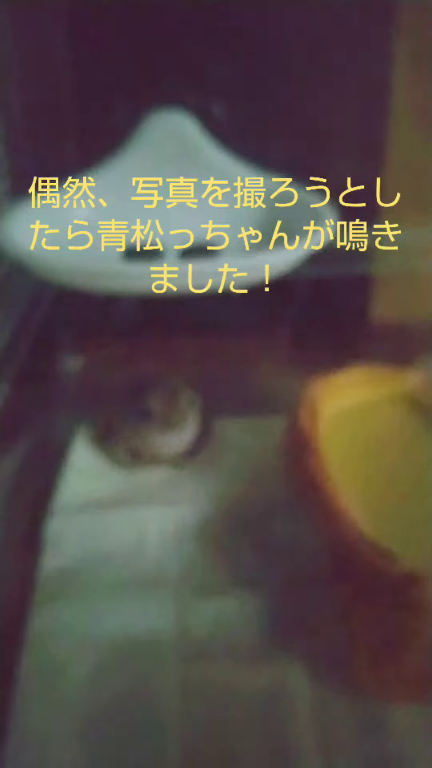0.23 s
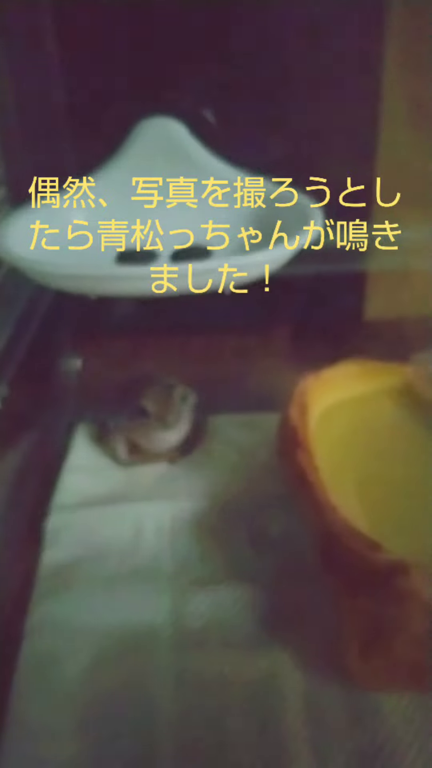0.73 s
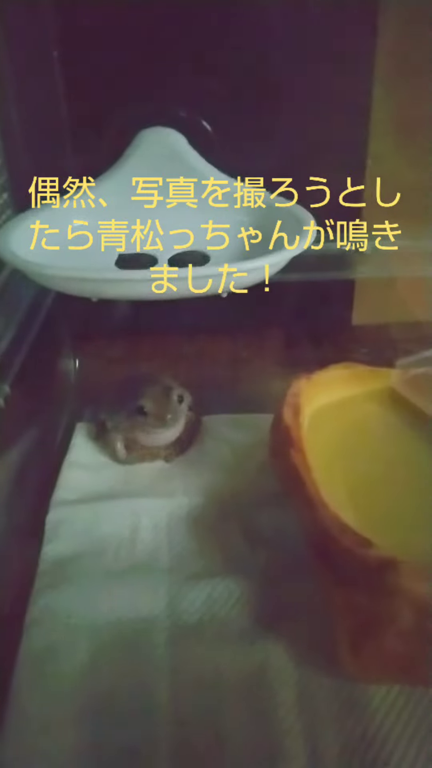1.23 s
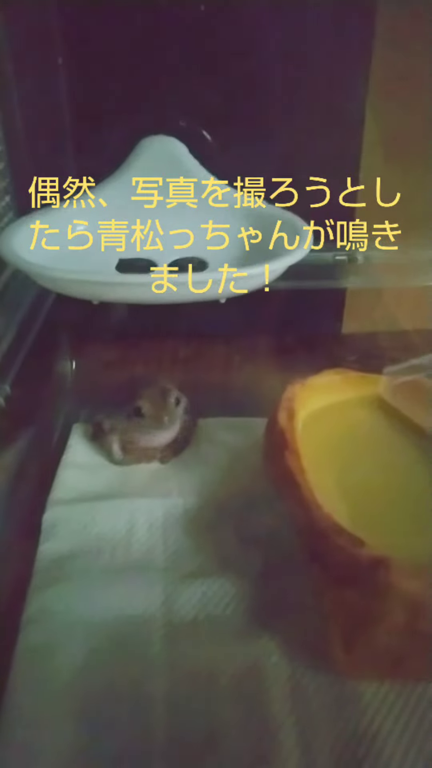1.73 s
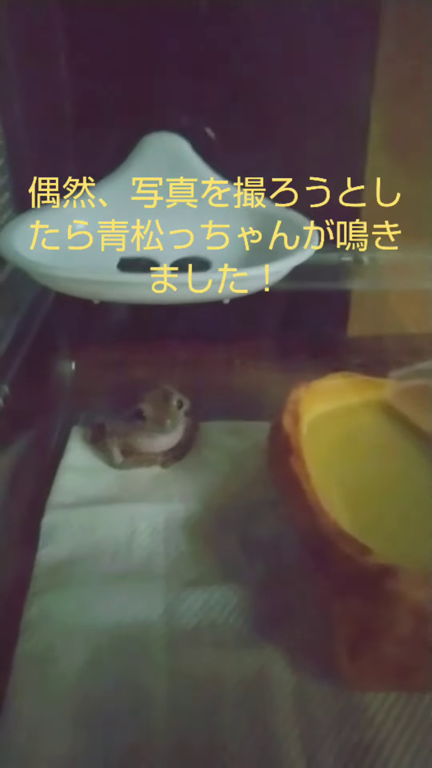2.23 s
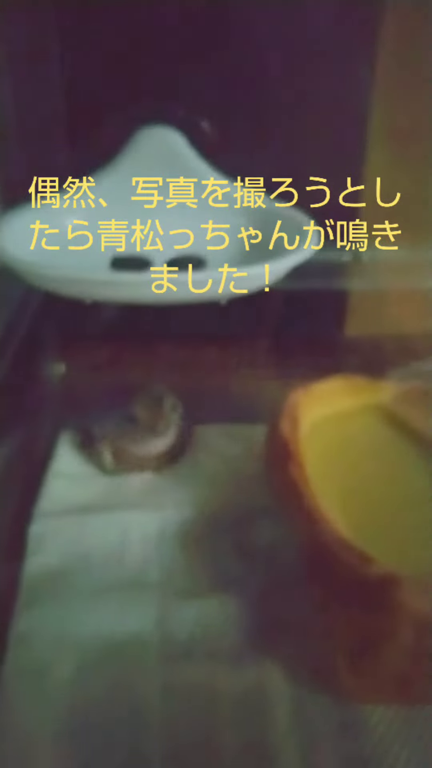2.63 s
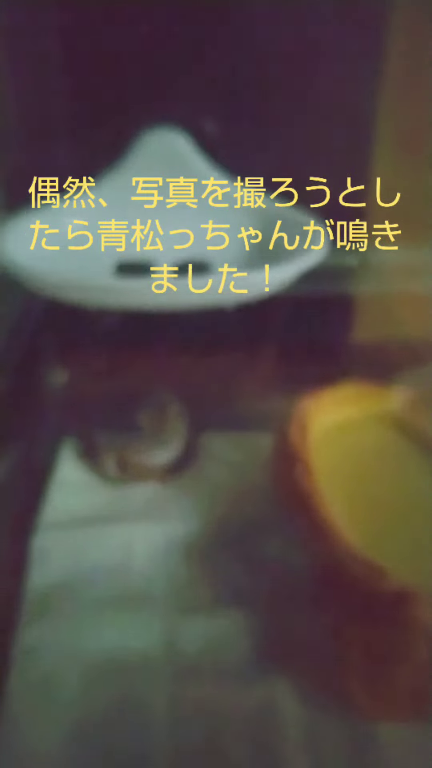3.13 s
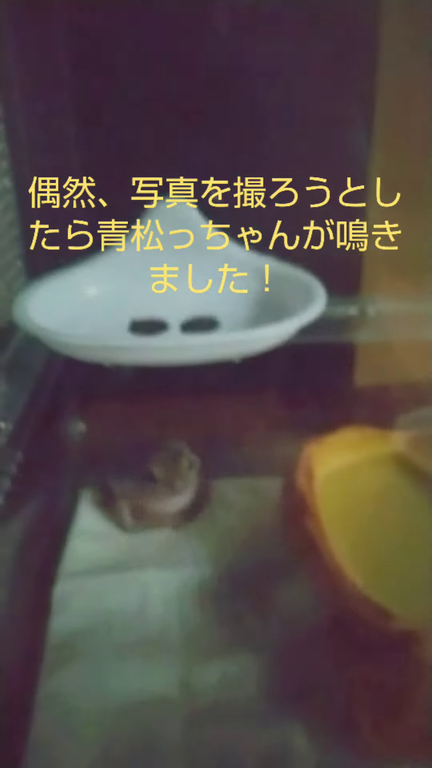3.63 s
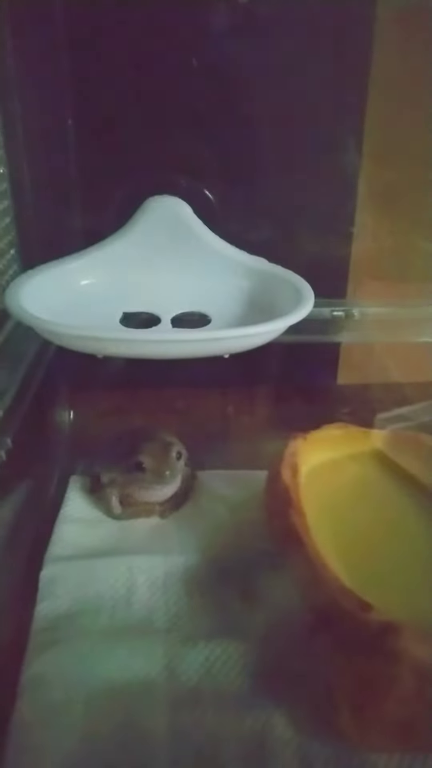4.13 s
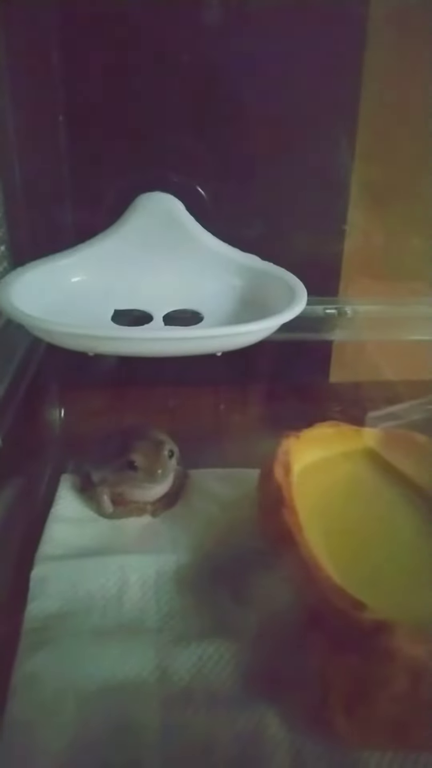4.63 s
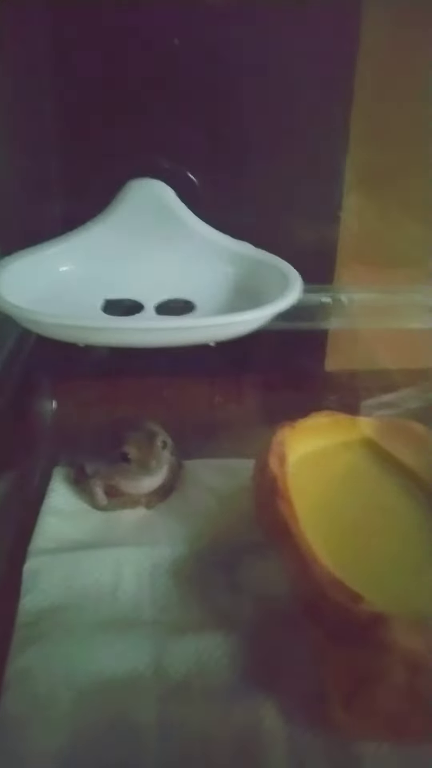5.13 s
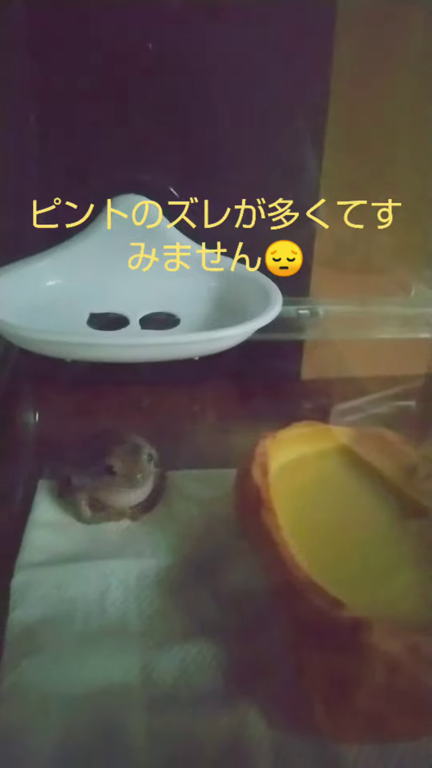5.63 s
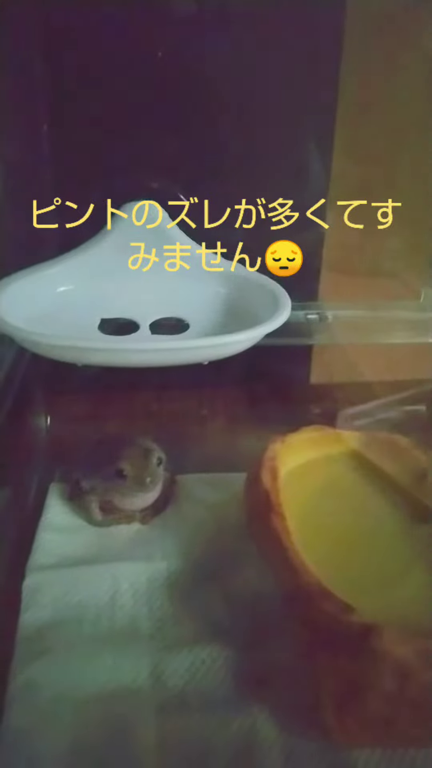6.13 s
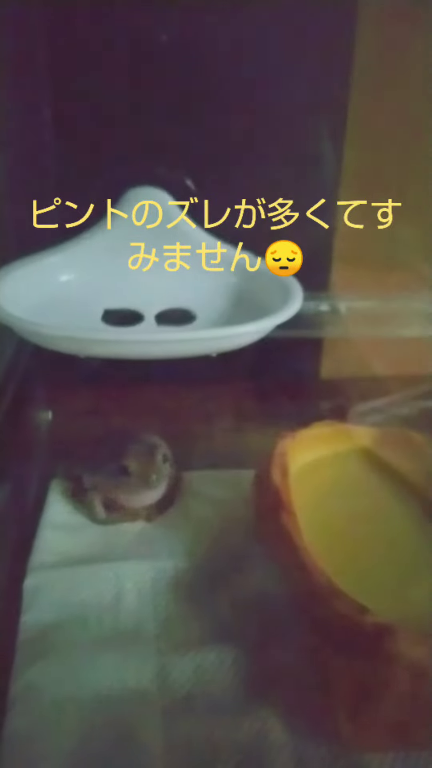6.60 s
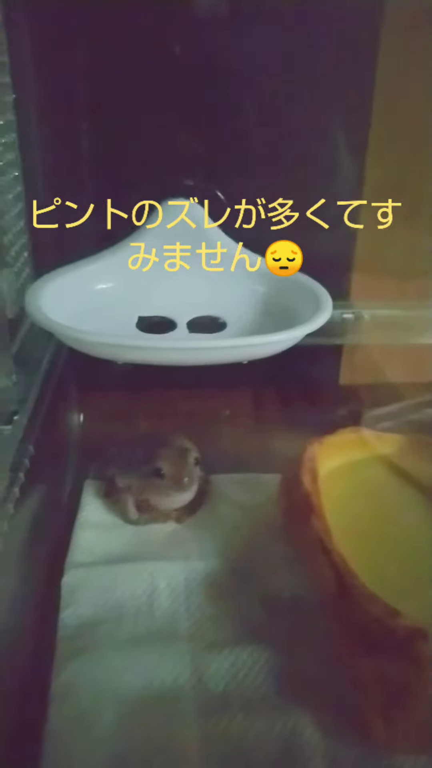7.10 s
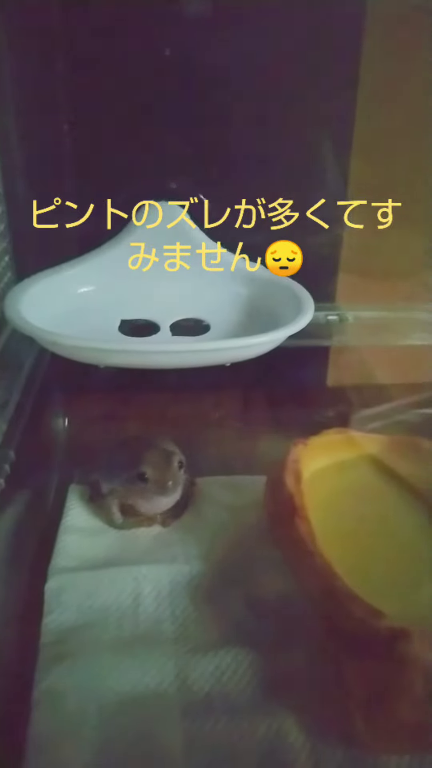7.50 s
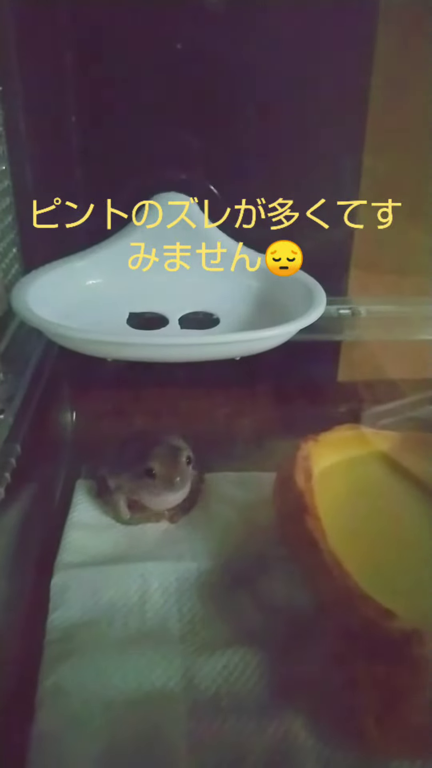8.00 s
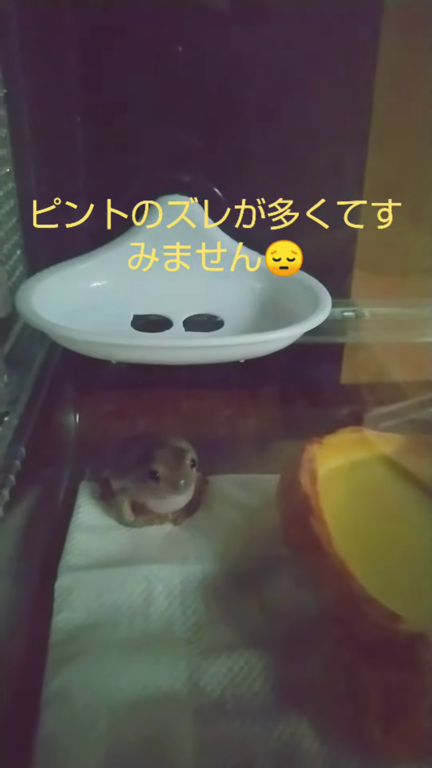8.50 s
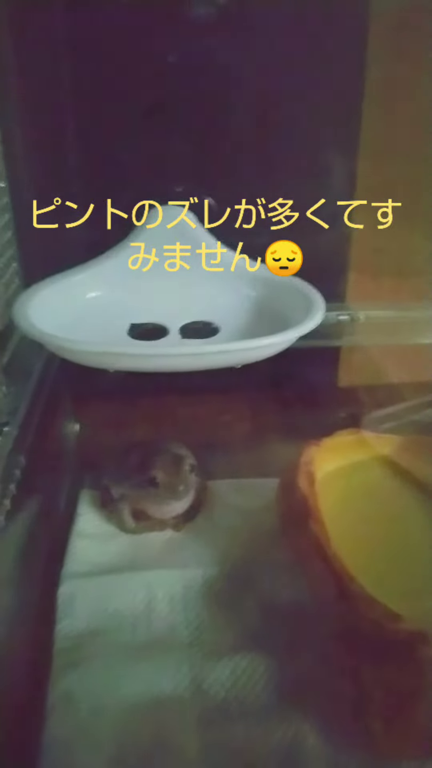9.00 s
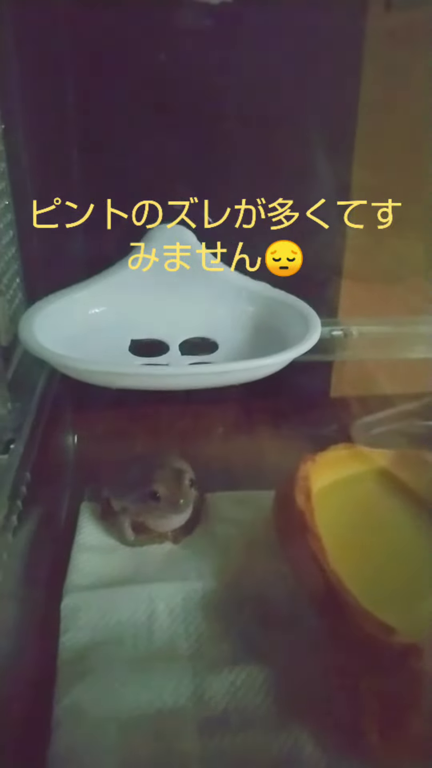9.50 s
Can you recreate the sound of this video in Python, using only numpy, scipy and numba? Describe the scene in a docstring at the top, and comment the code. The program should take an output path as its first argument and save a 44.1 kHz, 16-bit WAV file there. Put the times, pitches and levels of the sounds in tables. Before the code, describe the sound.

A small tree frog croaks steadily about twice a second in a glass tank, growing rougher and louder, over faint room hiss and hum.

```python
"""A quiet room, a glass tank, and a tree frog croaking about twice a second close to a hand-held phone.
Room tone: coloured hiss with a faint hum and whine. Near the phone: small ticks, soft bumps, a last sleeve rustle.
Each croak is a train of larynx pulses, ragged at first and steadier later, ringing chest, sac, throat and tank.
One push of air shapes every call; over the series the croaks grow broadly lower, rougher and louder.
Soft peeps come between later croaks, as air flows back from the sac."""
import sys
import numpy as np
from scipy import signal
from scipy.fft import rfft, irfft
from scipy.io import wavfile
from scipy.ndimage import uniform_filter1d
from numba import njit

SR = 44100
rng = np.random.default_rng(int(sys.argv[2]) if len(sys.argv) > 2 else 0)


def dump_mix(stems):
    """Bounce the given channels to the path in sys.argv[1] as a 16-bit WAV at rate SR."""
    frames = np.atleast_2d(stems).T  # one column per channel
    limited = np.clip(frames, -1, 1)  # hard clip at full scale
    pcm = np.round(limited * 32767).astype(np.int16)
    wavfile.write(sys.argv[1], SR, pcm)


N = 429975
CLOCK = np.arange(N) / SR  # seconds

# Room hiss outline: pitch_hz, density_db (per Hz, relative)
ROOM_OUTLINE = [(15, -26.5), (25, -5), (105, -2), (451, -12.5), (558, -12), (808, -14.5), (1000, -12),
                (1300, -18), (1890, -16), (2280, -21), (2530, -4.5), (3210, -17), (3480, -13.5),
                (4540, -25), (14200, -27)]
ROOM_DB = -58.5
# Hum and whine of appliances: pitch_hz, width_hz, level_db
HUM_LINES = [(67, 12, -76.5), (101.05, 4, -69.5), (137.7, 13, -72), (822, 26, -70), (2230, 15, -76.5),
             (2400, 23, -74), (2514, 28, -66), (2730, 200, -84), (3600, 22, -73), (4069, 50, -77.5)]
# A sleeve brushing past the phone: time_s, level_db
RUSTLE_LEVELS = [(9.54, -64), (9.565, -40.5), (9.582, -44.5), (9.598, -32.5), (9.65, -32.5), (9.69, -27.5),
                 (9.72, -35), (9.75, -34.5)]
# Outline of the cloth hiss: pitch_hz, level_db (relative)
RUSTLE_OUTLINE = [(300, -3), (1500, -4.5), (3000, 12.5), (5000, -2), (7400, 2.5), (10000, -5),
                  (12000, -0.5), (14000, 1.5)]
# Small dry ticks: start_s, peak_db
TICK_EVENTS = [(.413, -47), (3.524, -52.5), (5.386, -29), (6.467, -45.5), (7.079, -32.5), (7.368, -41),
               (7.869, -49), (9.052, -38.5), (9.065, -42), (9.106, -39), (9.113, -35.5), (9.122, -36)]
# Outline of a tick: pitch_hz, level_db (relative)
TICK_OUTLINE = [(200, -21.5), (1500, -7.5), (3000, 8.5), (6000, -4), (10000, -7), (13000, -6.5)]
# Soft bumps of the hand on the phone: start_s, pitch_hz, level_db, t60_s
HAND_BUMPS = [(.365, 70, -49, 0.085), (5.388, 75, -22, 0.0115), (9.03, 71.6, -25.5, 0.019)]

# Air modes of the glass tank: pitch_hz, width_hz, peak_db (relative to the direct sound)
TANK_MODES = [(290.2, 35, 0.5), (770.2, 34.3, 13.5), (820.2, 16.2, 15), (906, 59, 1.5), (1117.7, 73, 4.5),
              (1133, 18, 10.5), (1377.8, 33, 10), (1457.2, 24, 17), (1529.5, 24, 16.5), (1662, 62, 7),
              (1730, 100, -3.5), (1800, 10, -20), (2500, 30, -15.5), (2661, 29, 12), (2839.5, 100, 4.5),
              (2926, 24, 13.5), (3184, 110, 3), (3255, 81, -0.5), (3880, 24, -4), (3690, 15, 2.5)]
# Resonance outlines of the frog's body, each: pitch_hz, level_db (relative)
CHEST_OUTLINE = [(110, -38.5), (190, -6), (280, -0.5), (400, 6), (560, 6.5), (680, -18.5), (900, -44.5)]
SAC_OUTLINE = [(300, -63.5), (520, -18), (650, -3.5), (770, 5), (860, 2.5), (1000, -13.5), (1300, -54.5)]
THROAT_OUTLINE = [(700, -50.5), (950, 5), (1150, 5.5), (1430, 4), (1700, -1.5), (2000, 2.5), (2500, -60)]
RASP_OUTLINE = [(1500, -30), (2000, 3), (2400, 7.5), (2800, 5.5), (3200, -3.5), (3600, -3), (3800, -17.5),
                (4050, -35), (5000, -53.5), (14000, -77.5)]
# Sharp edge of each pulse, close and with little of the tank: pitch_hz, level_db (relative)
EDGE_OUTLINE = [(2500, -21), (3400, 4), (4250, -3), (4600, -7.5), (5000, -14.5), (6200, -19), (8000, -22),
                (10000, -39), (14000, -20)]
# Soft peeps as the sac empties: start_s, length_s, pitch_hz, level_db
PEEP_EVENTS = [(4.09, 0.0293, 343, -55.5), (4.572, .11, 362.4, -48.5), (6.039, 0.11, 347.5, -46.5),
               (7.992, .11, 358, -43.5), (8.461, 0.11, 356, -46), (8.963, 0.12, 346.9, -42),
               (9.51, 0.1, 350.5, -41.5)]
# Outline of a peep: pitch_hz, level_db (relative)
PEEP_OUTLINE = [(360, -25.5), (680, 3), (820, -11), (1050, -3.5), (1400, -15), (1900, -17.5), (2300, -7.5),
                (4000, -40)]
PEEP_ROUGHNESS = 0.16

# Croaks: start_s, length_s, swell_s, middle_pitch_hz, late_pitch_hz, roughness (about 0.3-1.2),
# sac_db, then throat_db, rasp_db and chest_db (relative to the sac)
CROAK_EVENTS = [(0.06, 0.175, 0.066, 289.2, 225.0, 0.295, -33.5, -5, -4.5, -19.5),
                (0.471, 0.18, 0.078, 276.6, 237.6, 0.36, -26.5, -4.5, -3.5, -20),
                (0.866, 0.19, 0.037, 282.8, 229.6, 0.41, -27.5, -6.5, -7, -20),
                (1.313, 0.19, 0.035, 258.8, 227, 0.39, -28.5, -4.3, -9.5, -19.5),
                (1.784, 0.21, 0.041, 223.6, 215.9, 0.52, -25.5, -6.5, -9, -22),
                (2.24, 0.21, 0.041, 204.4, 198.0, 0.55, -24.5, -7.5, -8.5, -22),
                (2.724, 0.2, 0.037, 191.5, 192.3, 0.81, -25, -6.5, -8, -24.5),
                (3.199, 0.1986, 0.039, 165.6, 187.4, 0.48, -26, -5.5, -8.2, -22),
                (3.675, 0.21, 0.042, 173.8, 193.6, 0.39, -24.5, -6.7, -10.5, -22.5),
                (4.193, 0.21, 0.044, 210.5, 198.0, 0.63, -23.5, -7.0, -10.5, -22),
                (4.725, 0.24, 0.0303, 215.8, 199.2, 0.61, -26, -6.0, -10.5, -20),
                (5.21, 0.19, 0.058, 197.7, 212.0, 0.81, -21.6, -4.5, -8.5, -23.5),
                (5.645, 0.212, 0.0425, 205.0, 179.7, 0.66, -21.5, -3.5, -4.6, -24),
                (6.161, 0.22, 0.034, 208.2, 163.9, 0.68, -22.0, -6, -6.5, -22),
                (6.652, 0.22, 0.041, 188.4, 171.9, 1.0, -23.5, -3, -2.5, -20.0),
                (7.135, 0.21, 0.0464, 204.9, 195.0, 0.89, -22.5, -3, -3, -21.5),
                (7.622, 0.22, 0.044, 206.5, 194.6, 0.92, -21.5, -6, -5, -22),
                (8.1, 0.22, 0.058, 186.2, 136.0, 1.16, -21.5, -4.5, -3.5, -21.5),
                (8.601, 0.22, 0.05, 200.8, 187.4, 1.09, -20, -3.5, -4.5, -24),
                (9.119, 0.21, 0.052, 190.7, 160.9, 1.05, -21, -1, -0.5, -20.5),
                (9.682, 0.21, 0.0445, 194.6, 170.0, 0.83, -22, -1.5, 0.5, -16)]
OPENING_PITCH, CLOSING_PITCH = 1.07, .8  # multiples of the middle and of the late pitch
THUD_DB = -5  # closing thud relative to the rasp
# Booms, where an overtone of the voice meets the ring of sac and tank:
# centre_s, half_width_s, lift_db (of the sac)
BOOM_EVENTS = [(0.15, 0.018, 5.5), (0.196, 0.0097, 8), (0.591, 0.0387, 9.5), (1, 0.0298, 7),
               (1.428, 0.0335, 7), (1.881, 0.011, 5), (1.952, 0.009, 4), (2.345, 0.023, 4.5),
               (2.42, 0.01, 6.6), (2.879, 0.011, 7), (3.305, 0.027, 6.5), (3.843, 0.029, 4.5),
               (4.366, 0.0074, 5), (4.848, 0.007, 9.5), (4.932, 0.014, 7.5), (5.8, 0.0064, 7.5),
               (5.84, 0.01, 9.5), (6.337, 0.0094, 5.4), (6.804, 0.038, 4.5), (7.3, 0.0054, 10),
               (7.814, 0.0172, 6), (8.785, 0.0168, 3.5), (9.303, 0.0052, 4.5)]
BOOM_BEAT = 0.97  # depth of the dips on both sides of a boom, where overtone and ring cancel
# Answer of each part to the push of air: onset_s, rise_db, rise_time (multiple of swell_s),
# drift_db (over the croak), ahead_s (release before the closing), tail_db
SAC_ANSWER = (0.01, 17, 1.0, 4.5, 0.0219, -24.5)
THROAT_ANSWER = (0.015, 24.5, 0.79, -13.5, 0.01, -22)
RASP_ANSWER = (0.0273, 32, 1.1936, -13.5, 0.0129, -16)
RELEASE_T60_S, TAIL_T60_S = 0.12, 0.41

TOP_HZ = 14350  # upper limit of the phone microphone


def undb(db):
    """Decibels to gain."""
    return 10 ** (np.asarray(db) / 20)


def unit(x):
    """Scale to rms 1."""
    return x / np.sqrt(np.mean(x ** 2) + 1e-20)


def decay(t, t60):
    """A fall of 60 dB in t60 seconds."""
    return np.exp(-np.log(1000) * t / t60)


def ring(x, response):
    """Pass a sound through an impulse response."""
    return signal.fftconvolve(x, response)[:len(x)]


def colour(x, points, size=2048):
    """Causal (minimum-phase) filter with the given (Hz, dB) outline."""
    hz, db = np.transpose(points)
    grid = np.maximum(np.arange(size // 2 + 1) * SR / size, 1)
    outline_db = np.interp(np.log(grid), np.log(hz), db)
    cepstrum = irfft(np.log(undb(outline_db)))
    # folding the cepstrum forward in time makes the filter causal
    cepstrum[1:size // 2] *= 2
    cepstrum[size // 2 + 1:] = 0
    return ring(x, irfft(np.exp(rfft(cepstrum))))


def steady(x, seconds):
    """Even out slow swells to about rms 1 and keep the fast grain."""
    width = max(int(seconds * SR), 2)
    power = uniform_filter1d(uniform_filter1d(x ** 2, width), width)
    return x / np.sqrt(np.abs(power) + 1e-7 * np.mean(x ** 2))


@njit
def resonance(x, hz, width):
    """State-variable band-pass with a moving centre, gain 1 at the centre."""
    y, band, low = np.empty(len(x)), 0., 0.
    for i in range(len(x)):
        g, k = np.tan(np.pi * hz[i] / SR), width / hz[i]
        v = (band + g * (x[i] + 1e-18 - low)) / (1 + g * (g + k))
        band, low, y[i] = 2 * v - band, low + 2 * g * v, k * v
    return y


def add(track, start, sound):
    """Mix a sound into a track at a time in seconds."""
    i = int(np.clip(start * SR, 0, N - 1))
    track[i:i + len(sound)] += sound[:N - i]


def wide_noise(points, side_db):
    """Coloured noise, the same in both channels except in the treble."""
    mid, side = (colour(rng.standard_normal(N), points) for _ in range(2))
    treble = signal.butter(14, 5000, "high", fs=SR, output="sos")
    side = signal.sosfilt(treble, side)
    return (mid + undb(side_db) * np.outer([1, -1], side)) / np.std(mid)


def room_tone():
    """Soft hiss with narrow bands of noise, heard as wavering lines of hum and whine."""
    grid = np.arange(N // 2 + 1) * SR / N
    power = np.zeros(len(grid))
    for hz, width, db in HUM_LINES:
        power += undb(db) ** 2 / width * np.exp(-np.pi * ((grid - hz) / width) ** 2)
    hum = irfft(rfft(rng.standard_normal(N)) * np.sqrt(power * SR / 2), N)
    return hum + undb(ROOM_DB) * wide_noise(ROOM_OUTLINE, side_db=-8.5)


def rustle(grain_db=1.0):
    """Cloth fibres catch and slip: a grainy hiss."""
    s, db = np.transpose(RUSTLE_LEVELS)
    catch = unit(uniform_filter1d(rng.standard_normal(N), size=90))
    hiss = wide_noise(RUSTLE_OUTLINE, side_db=-5)
    level = undb(np.interp(CLOCK, s, db) + grain_db * catch)
    return hiss * level * (CLOCK > s[0])


def handling():
    """Dry ticks as short noise bursts, and dull bumps as decaying low tones."""
    out, t = np.zeros(N), CLOCK[:SR // 6]
    for start, db in TICK_EVENTS:
        tick = colour(rng.standard_normal(len(t)) * decay(t, 0.015), TICK_OUTLINE)
        add(out, start, undb(db) * tick / np.abs(tick).max())
    for start, hz, db, t60 in HAND_BUMPS:
        add(out, start, undb(db) * np.sin(2 * np.pi * hz * t) * decay(t, t60))
    return out


def reflections(t60, db):
    """A dense decaying train of random echoes with the given total energy."""
    t = CLOCK[:SR // 2]
    echoes = rng.standard_normal(len(t)) * decay(t, t60) * (1 - np.exp(-t / 0.0021))
    return undb(db) * unit(echoes) / np.sqrt(len(t))


def tank_response():
    """The direct sound followed by the ringing air modes of the tank."""
    t = CLOCK[:SR // 2]
    response = np.zeros(len(t))
    for hz, width, db in TANK_MODES:
        strength = undb(db) * 2 * np.pi * width / SR
        response += strength * np.exp(-np.pi * width * t) * np.cos(2 * np.pi * hz * t)
    response[0] += 1
    return response


def larynx(progress, hz, ragged, jitter, shimmer_db, air):
    """One pulse a cycle until the larynx closes; raggedness scatters the pulses and adds a hiss of air."""
    cycles = np.cumsum(hz) / SR
    at = np.flatnonzero(np.diff(np.floor(cycles)) > 0)
    chance = rng.standard_normal((256, 2))[:len(at)]
    shift = jitter * ragged[at] * chance[:, 0] * SR / hz[at]
    moved = np.clip(at + shift, 0, len(hz) - 1).astype(int)
    pulses = np.zeros(len(hz))
    pulses[moved] = undb(shimmer_db * ragged[at] * chance[:, 1])
    # the hiss is strongest just after the start of each cycle
    hiss = air * ragged * np.exp(-(cycles % 1) / .5) * rng.standard_normal(len(hz))
    closing = np.clip((1 - progress) / 0.079, 0, 1)
    return (pulses + hiss) * closing


def peep(length, hz, db, tank, fall=0.098):
    """Weak, high pulses that sink slightly as air flows back from the sac."""
    progress = np.minimum(CLOCK[:SR // 4] / length, 1)
    ragged = np.full(len(progress), PEEP_ROUGHNESS)
    sinking_hz = hz * (1 + fall * (.5 - progress))
    pulses = larynx(progress, sinking_hz, ragged, jitter=.25, shimmer_db=18, air=.1)
    voice = steady(ring(colour(pulses, PEEP_OUTLINE), tank), seconds=.03)
    return undb(db) * voice * np.sin(np.pi * progress)


def thud(since):
    """The larynx shuts with a small thud that rings the lowest mode of the tank."""
    since = np.maximum(since, 0)
    tone = np.sin(2 * np.pi * TANK_MODES[0][0] * since)
    return tone * (1 - np.exp(-since / 0.0026)) * decay(since, 0.0942)


def boom(t):
    """Gain of the sac: it lifts at each boom and dips just before and after."""
    db = 0
    for s, half_width, lift_db in BOOM_EVENTS:
        away = ((t - s) / half_width) ** 2
        db = db + lift_db * (1 - BOOM_BEAT * away) * np.exp(-away)
    return undb(db)


def push(since, length, swell, answer, curve=1.69):
    """Gain of one part of the voice: it swells, drifts while the air lasts, then drops into a soft tail."""
    onset, rise_db, rise_time, drift_db, ahead, tail_db = answer
    rise = -rise_db * np.exp(-(since / (swell * rise_time)) ** curve)
    drift = drift_db * (np.minimum(since / length, 1) - .5)
    released = np.maximum(since - length + ahead, 0)
    release = decay(released, RELEASE_T60_S) + undb(tail_db) * decay(released, TAIL_T60_S)
    return undb(rise + drift) * release * np.minimum(since / onset, 1) ** 1.3


def throat_resonances(pulses, progress, tension):
    """Resonances that rise at the onset and then sink; a higher one joins toward the end."""
    middle_hz = np.interp(progress, [0, .28, .6], [950, 1480, 1150])
    upper_hz = tension * np.interp(progress, [.1, .3, .55, .8], [2330, 3200, 2686, 1910])
    late_hz = np.interp(progress, [.6, 1], [3500, 2950])
    whistle_hz = np.interp(progress, [.25, .65], [7500, 6750])
    nasal = .85 * pulses + resonance(pulses, middle_hz, 350.)
    bright = .4 * pulses + resonance(pulses, upper_hz, 450.)
    bright = bright + np.clip(progress, 0, 1) * resonance(pulses, late_hz, 500.0)
    whistle = resonance(pulses, whistle_hz, 400.)
    overtone = resonance(whistle, np.full(len(pulses), 7250.), 1000.)
    return nasal, bright, overtone


def croak(row, tank, edge_db=-25, overtone_db=-38, tighten=0.0055):
    """Larynx pulses ring chest, sac and throat inside the tank."""
    start, length, swell, middle_hz, late_hz, rough, sac_db, throat_db, rasp_db, chest_db = row
    since = CLOCK[:SR // 2]
    progress = since / length
    # the pitch sags as the push runs out, and the beat of the folds grows steadier
    pitches = [OPENING_PITCH * middle_hz, middle_hz, late_hz, CLOSING_PITCH * late_hz]
    hz = np.interp(progress, [0, .5, .86, 1], pitches)
    ragged = rough * np.interp(progress, [0, .4, .8], [1.5, .95, .42])
    pulses = larynx(progress, hz, ragged, jitter=.11, shimmer_db=4.5, air=.045)
    # a harder push tightens the throat and lifts its upper resonances
    tension = 1 + tighten * (sac_db + rasp_db + 26.5)
    rasp_outline = [(f * tension, db) for f, db in RASP_OUTLINE]
    nasal, bright, overtone = throat_resonances(pulses, progress, tension)
    # the sac opens most abruptly, the throat a little softer, the rasp slowest;
    # throat and rasp fade while the sac swells
    sac = undb(sac_db) * push(since, length, swell, SAC_ANSWER)
    throat = undb(sac_db + throat_db) * push(since, length, swell, THROAT_ANSWER)
    rasp = undb(sac_db + rasp_db) * push(since, length, swell, RASP_ANSWER)
    # the deep part comes late, when the sac is full
    chest = sac * undb(chest_db + np.interp(progress, [.45, .9], [-3, 2.5]))
    parts = [(colour(pulses, CHEST_OUTLINE), chest),
             (colour(pulses, SAC_OUTLINE), sac * boom(start + since)),
             (colour(nasal, THROAT_OUTLINE), throat),
             (colour(bright, rasp_outline), rasp),
             (overtone, rasp * undb(overtone_db))]
    # a fresh dense train of random echoes blurs each croak inside the ringing tank
    early_glass = ring(reflections(t60=0.077, db=0), tank)
    glass = tank + early_glass + reflections(t60=0.35, db=-3.0)
    body = sum(gain * steady(ring(source, glass), seconds=0.0177) for source, gain in parts)
    # the sharp edge of each pulse meets only the nearest walls and grows as the push builds
    near_walls = reflections(t60=.04, db=-3)
    edge = steady(colour(pulses + ring(pulses, near_walls), EDGE_OUTLINE), seconds=0.022)
    edge = edge * undb(edge_db) * np.sqrt(rasp * throat) * np.clip(progress / 0.51, 0, 1)
    closing_thud = undb(sac_db + rasp_db + THUD_DB) * thud(since - length + .014)
    return body + edge + closing_thud


def frog():
    """All croaks and peeps, with a little of the room around the tank."""
    out, tank = np.zeros(N), tank_response()
    for row in CROAK_EVENTS:
        add(out, row[0], croak(row, tank))
    for start, length, hz, db in PEEP_EVENTS:
        add(out, start, peep(length, hz, db, tank))
    room = reflections(t60=.38, db=-19)
    return out + ring(out, room)


def scene():
    """The frog straight ahead, over the sounds of the room and the hand."""
    return room_tone() + rustle() + handling() + frog()


def record(dry):
    """The phone microphone opens after a moment, drops the deepest rumble and cuts the top."""
    opening = np.clip((CLOCK - .075) / .015, 0, 1)
    rumble_cut = signal.butter(3, 42, "high", fs=SR, output="sos")
    top_cut = signal.ellip(10, .2, 70, TOP_HZ, fs=SR, output="sos")
    thin = signal.sosfilt(rumble_cut, dry * opening)
    return signal.sosfilt(top_cut, thin)


dry = scene()
out = record(dry)
dump_mix(out)
```